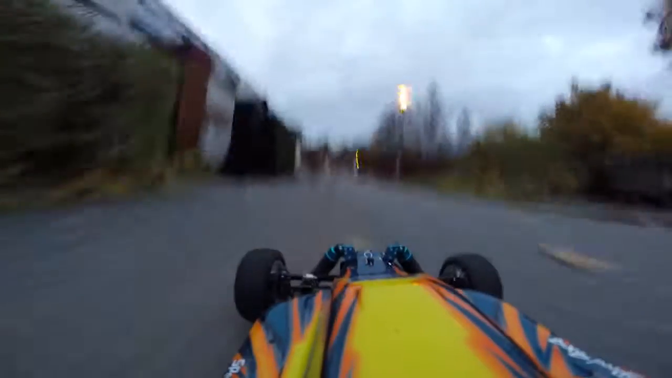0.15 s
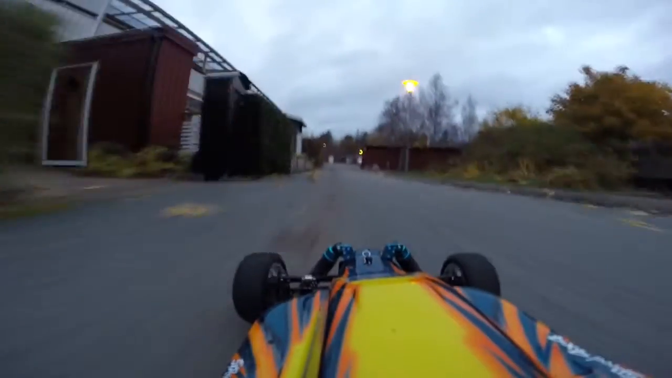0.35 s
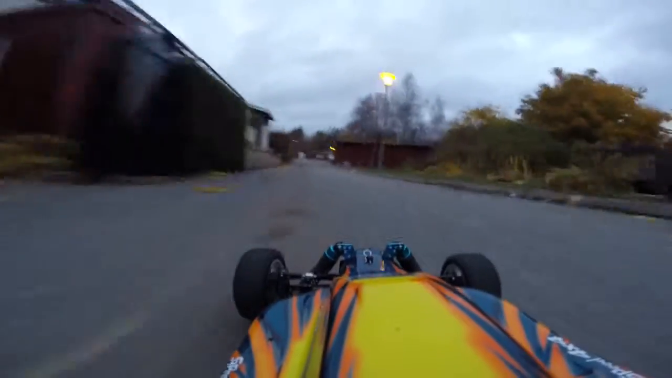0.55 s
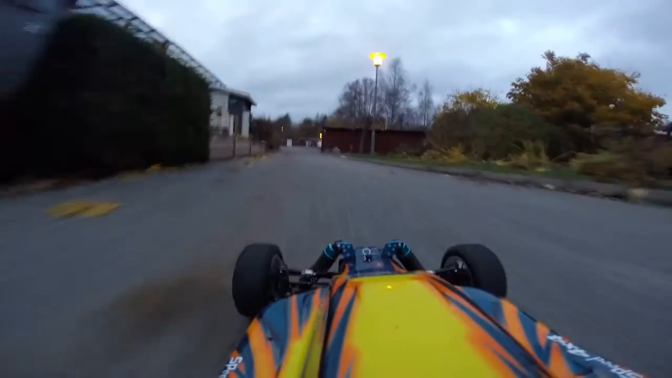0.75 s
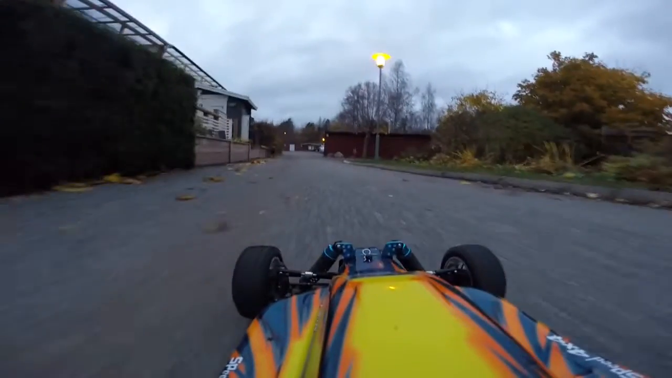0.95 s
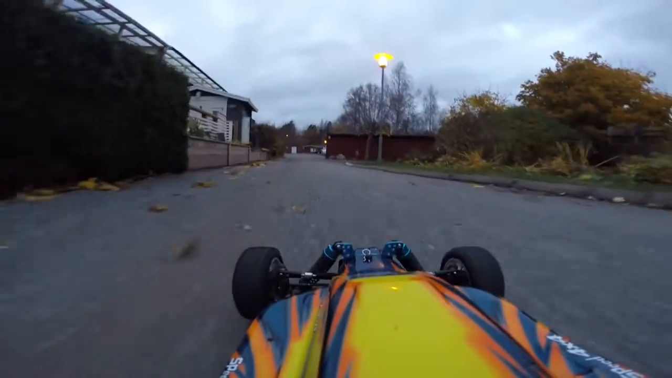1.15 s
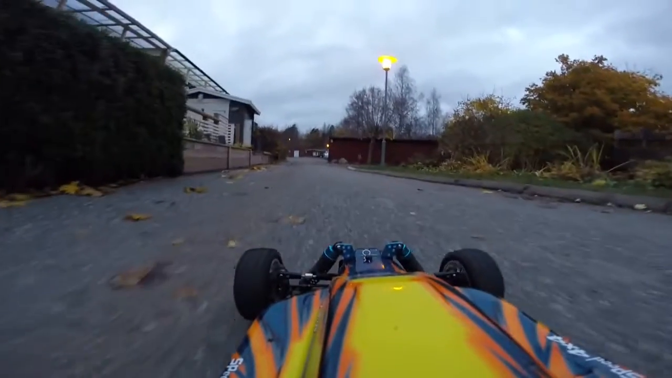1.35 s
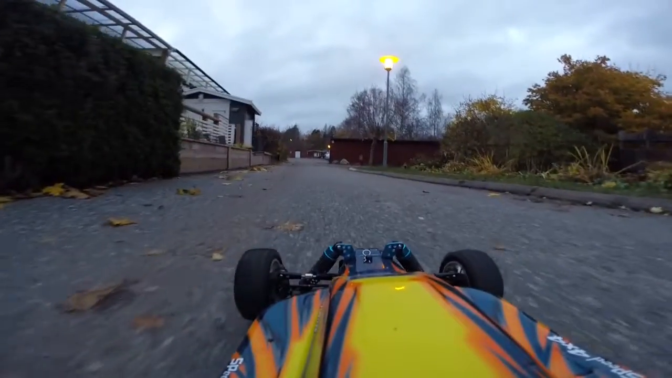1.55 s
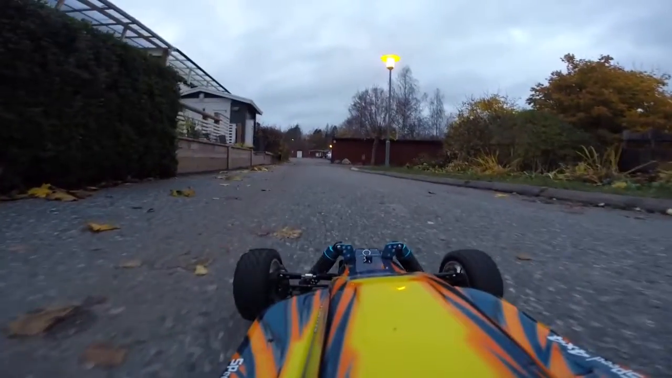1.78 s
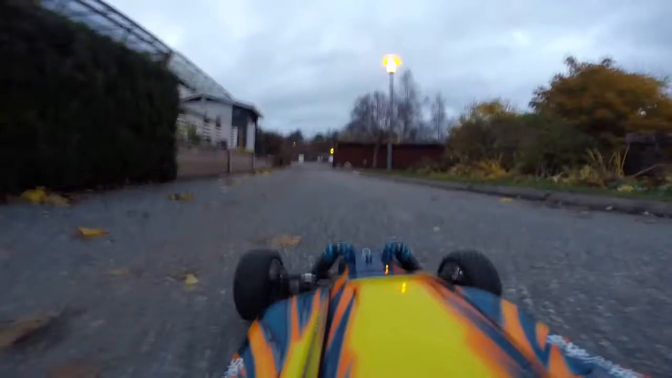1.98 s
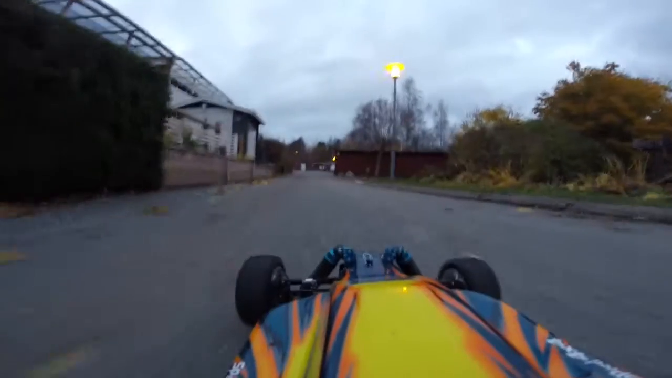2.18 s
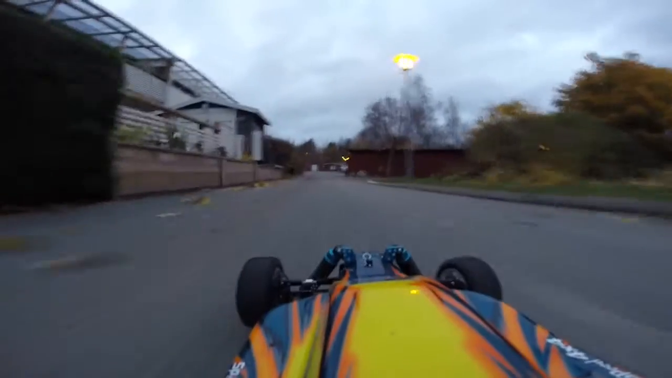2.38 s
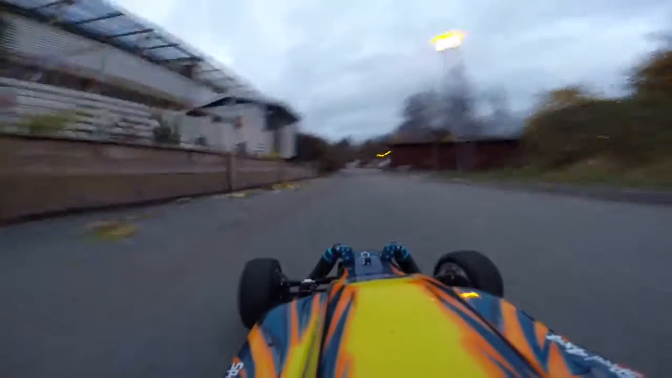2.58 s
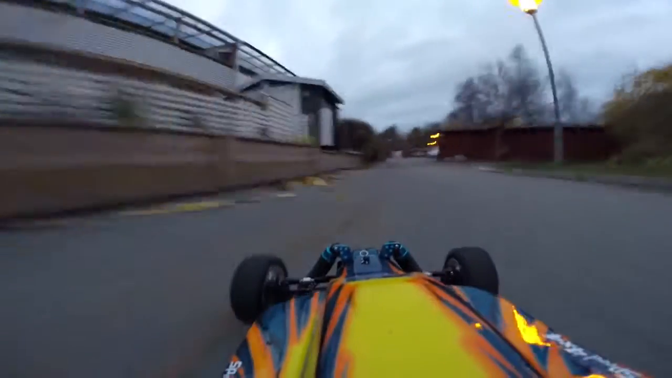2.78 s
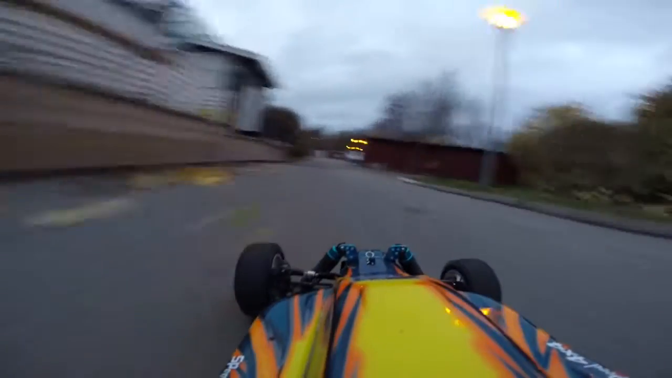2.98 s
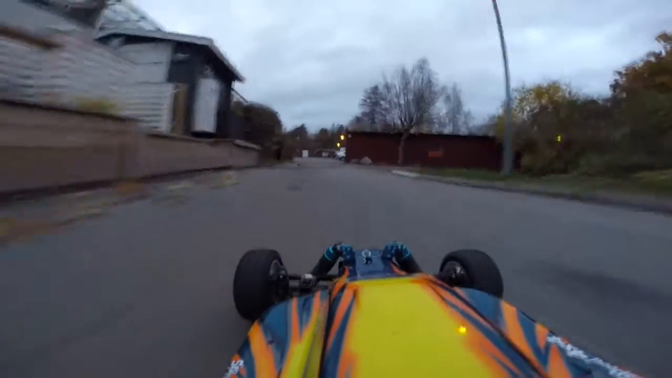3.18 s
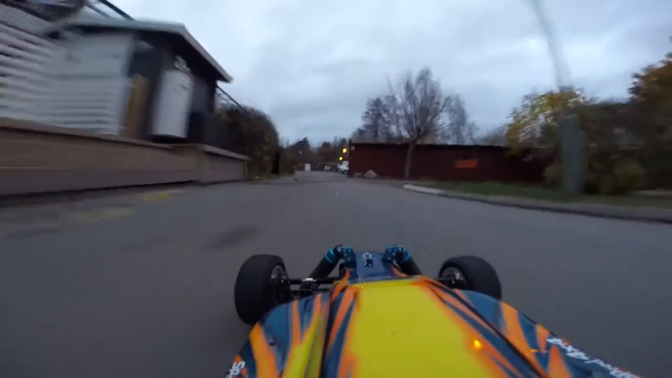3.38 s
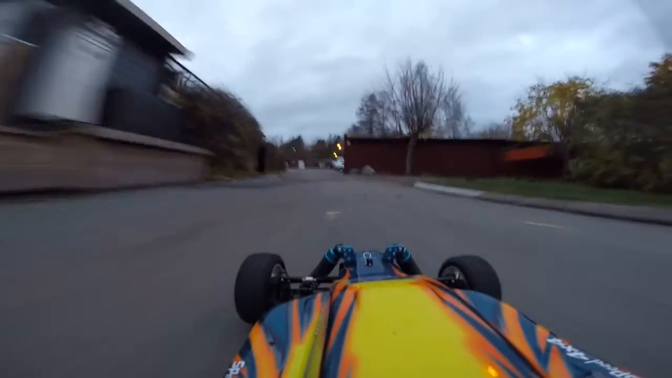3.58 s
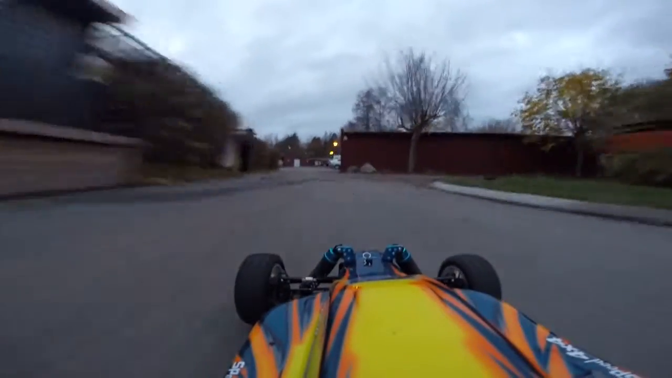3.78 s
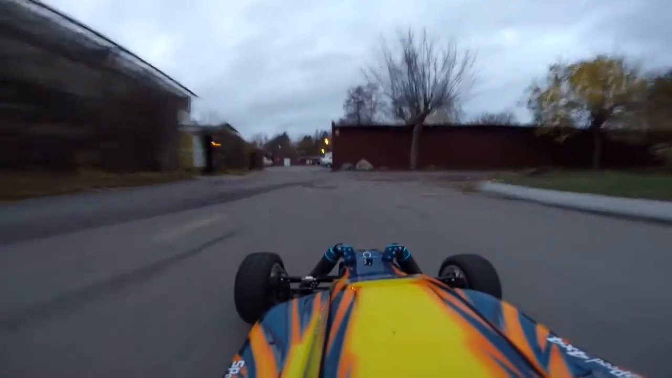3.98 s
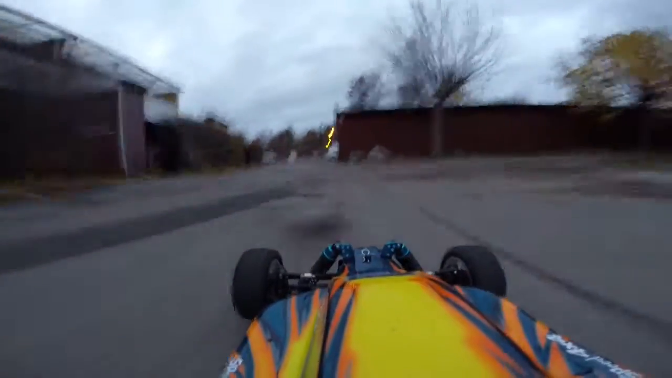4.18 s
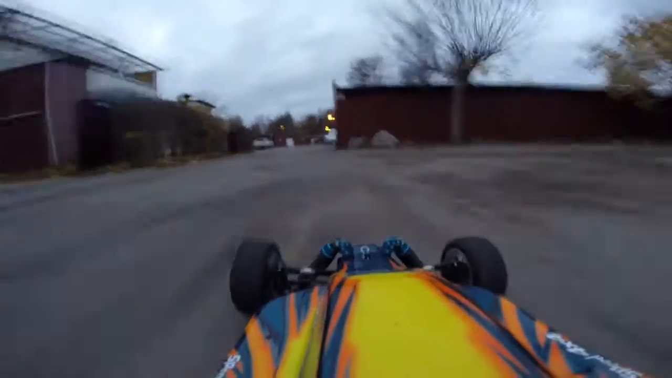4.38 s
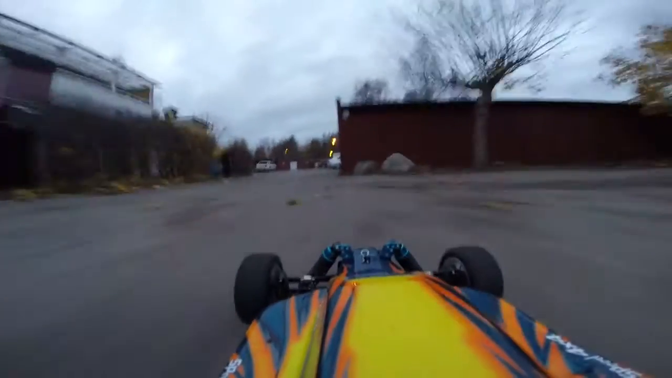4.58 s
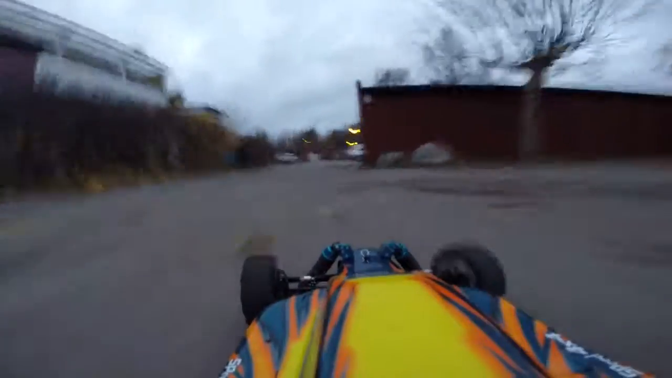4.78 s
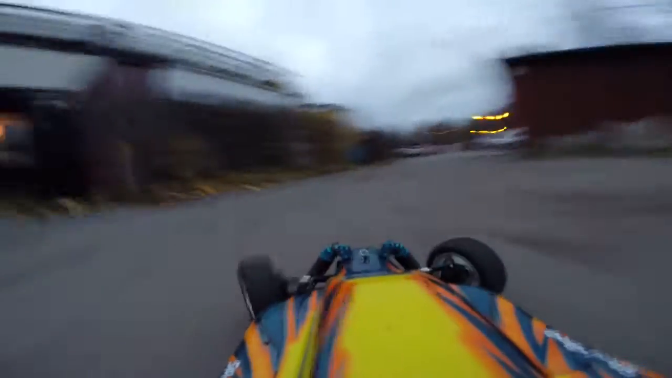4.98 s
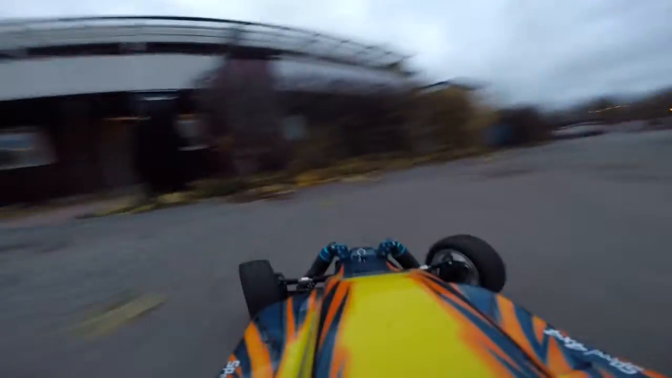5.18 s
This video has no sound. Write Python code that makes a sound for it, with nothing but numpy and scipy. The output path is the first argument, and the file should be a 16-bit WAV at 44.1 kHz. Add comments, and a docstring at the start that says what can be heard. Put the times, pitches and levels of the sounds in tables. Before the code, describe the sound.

A small electric remote-control buggy is heard close up from its own body, with tyres rolling on asphalt and low wind rumble throughout. It starts with a high, rising motor whine and chattering gears. At about 0.5 seconds there is a knock, and the brake sings a steady high note until 1.3 seconds while the whine falls away. The car rolls slowly and more quietly, with a low fan hum. Around 1.9 to 2 seconds several sharp knocks and thuds shake the plastic shell. The raspy whine then climbs until 2.6 seconds and eases into a rattling coast. From 3.2 seconds it rises again, reaching its highest pitch just before 4 seconds. A short braking tone follows from 4.2 to 4.4 seconds as the pitch drops. The buggy then coasts with rattles, a softer sinking whine and stronger rumble until about 5 seconds.

```python
"""A whining, rattling little radio-controlled buggy races along a paved lane, heard from its own body.
It speeds up, brakes to a roll, bumps and pulls away, coasts, sprints and brakes again.
The electric motor's whine rises with speed, and the fast-switching brake sings one fixed note.
Gears, tyres and bumps shake the plastic shell and make it ring.
Underneath, a cooling fan hums and wind buffets the microphone."""
import sys
import numpy as np
from scipy import signal
from scipy.fft import rfft, irfft
from scipy.io import wavfile

SR = 44100
rng = np.random.default_rng(int(sys.argv[2]) if len(sys.argv) > 2 else 0)


def to_wav(sig):
    """Store sig (one row per channel, or 1-D mono) as 16-bit WAV at the path in sys.argv[1].

    Samples outside -1..1 are clipped; the rate is SR.
    """
    pcm = np.clip(np.atleast_2d(sig), -1, 1) * 32767
    pcm = np.round(pcm).astype(np.int16)
    wavfile.write(sys.argv[1], SR, pcm.T)  # frames by channels


N = 231260
TIME = np.arange(N) / SR
HZ = np.fft.rfftfreq(8192, 1 / SR)
# "speed" is the base pitch of the whine in Hz; "cycles" counts its waves since the start
CRUISE_HZ, BRAKE_HZ = 800, 1016.4  # cruising speed; how fast the brake switches on and off

# when the throttle is open: start/s, end/s, gear chatter/dB, brightness/dB, whine/dB
THROTTLES = [(-.1, .485, -16, 1.5, -3.5), (2.015, 2.608, -18, 3, -1.5), (3.16, 3.979, -17.5, 2, -2)]
# when the brake is on: start/s, end/s, gear chatter/dB, brightness/dB, whine/dB
BRAKES = [(0.54, 1.274, -18, -9, 0), (4.156, 4.436, -15, -4, -4.5)]


def amp(db):
    """Turns decibels into a number to multiply by."""
    return 10 ** (np.asarray(db) / 20)


def unit(x):
    """Scales a signal to an average strength (rms) of one."""
    return x / np.sqrt(np.mean(x ** 2) + 1e-20)


def curves(rows):
    """Joins a table's points with straight lines in time, one curve per column."""
    times, *columns = np.transpose(rows)
    return [np.interp(TIME, times, column) for column in columns]


def wander(hz):
    """A smooth random wobble of strength one, mostly slower than hz."""
    size = N // 16 + 2
    f = np.fft.rfftfreq(size, 16 / SR)
    slow = irfft(rfft(rng.standard_normal(size)) / (1 + (f / hz) ** 4), size)
    return unit(np.interp(np.arange(N) / 16, np.arange(size), slow))


def tinted_noise(points):
    """Noise of strength one, coloured by rows of f/Hz, level/dB."""
    hz, db = np.transpose(points)
    f = np.fft.rfftfreq(N, 1 / SR)
    gain = amp(np.interp(np.log(f + 1), np.log(hz), db))
    return unit(irfft(rfft(rng.standard_normal(N)) * gain, N))


def highs(x, hz):
    """The part of a sound above hz."""
    return signal.sosfiltfilt(signal.butter(4, hz, "high", fs=SR, output="sos"), x)


def switched(rows, edge_s=0.012):
    """Throttle or brake over time: how far on (0-1), chatter gain, brightness in dB, whine gain."""
    held = np.array([np.clip(np.minimum(TIME - on, off - TIME) / edge_s, 0, 1) for on, off, *_ in rows])
    chatter_db, bright_db, whine_db = np.transpose(rows)[2:]
    return held.sum(0), amp(chatter_db) @ held, bright_db @ held, amp(whine_db) @ held


def throttle():
    """How far the throttle is open, 0-1."""
    return switched(THROTTLES)[0]


def braking():
    """How far the brake is on, 0-1."""
    return switched(BRAKES)[0]


def coasting():
    """One while neither throttle nor brake is on."""
    return np.clip(1 - throttle() - braking(), 0, 1)


def shell_gain(hz):
    """How strongly the plastic shell answers when shaken at hz."""
    # pitches at which the shell and its camera case ring: f/Hz, width/Hz, level/dB
    resonances = [(327, 600, -19.5), (728, 265, -9.5), (1320, 273, -9.5), (1548.5, 333, 3), (2039, 308, 2),
                  (2548, 118, -5.5), (2662, 228, -9), (3103, 120, -22), (3543, 560, -25),
                  (4290, 320, -21.5), (4760, 270, -19.5), (5040, 450, -27.5), (5690, 610, -25),
                  (6380, 490, -29.5), (6954, 360, -35.5), (7980.0, 640, -44), (9580, 1900, -48.5),
                  (11400, 920.0, -56), (13480.0, 5500, -68)]
    power = sum(amp(db) ** 2 / (1 + (1.2 * (hz - f) / width) ** 2) ** 3 for f, width, db in resonances)
    return np.sqrt(power + 1e-12)


def ring(force):
    """A force shakes the shell and takes on its ringing colour."""
    log_gain = np.log(shell_gain(HZ))
    mirrored = np.r_[log_gain, log_gain[-2:0:-1]]
    # the shell's sound after one sharp tap (minimum phase: it starts at once)
    tap = np.fft.ifft(np.exp(np.conj(signal.hilbert(mirrored)))).real[:2048]
    return signal.oaconvolve(force, tap / np.linalg.norm(tap))[:N]


def rumble(gust_db=1.5, bump_db=2.5):
    """Wind gusts against the microphone, and road bumps boom through the buggy's frame."""
    # strength of both rumbles: t/s, wind/dB, boom/dB
    levels = [(0, -26.5, -31), (.56, -35.5, -31.5), (.72, -37.5, -38.5), (1.7, -37, -39), (2.03, -22, -23),
              (2.22, -34, -35), (2.65, -33.5, -33), (2.96, -35, -25), (3.2, -29.5, -35),
              (3.7, -36.5, -31.5), (4.25, -32.5, -35.5), (4.65, -39, -36.5), (4.85, -25, -28),
              (5.24, -28.5, -22)]
    # colour of the wind: f/Hz, level/dB
    wind_colour = [(10, -15.5), (25, 3.5), (45, -13), (70, -5.5), (110, -10), (200, -41.5), (500, -67.5),
                   (3000, -110)]
    # colour of the booming frame: f/Hz, level/dB
    boom_colour = [(50, -23), (100, -5.5), (145, 4), (185, 2.5), (220, 10.5), (260, 1.5), (340, -6.5),
                   (600, -35.5), (3000, -110)]
    wind_db, boom_db = curves(levels)
    wind = amp(wind_db + gust_db * wander(hz=5)) * tinted_noise(wind_colour)
    boom = amp(boom_db + bump_db * wander(hz=10)) * tinted_noise(boom_colour)
    return wind + boom


def fan(pitch_hz=234.6, waver=0.0023):
    """The cooling fan spins at a nearly steady rate and hums one low note."""
    # strength of the hum: t/s, level/dB
    levels = [(0, -52.5), (1.2, -36), (1.3, -29), (1.6, -26.5), (1.7, -22), (1.88, -20), (1.97, -54),
              (5.24, -34)]
    cycles = np.cumsum(pitch_hz * (1 + waver * wander(hz=10))) / SR
    return np.sqrt(2) * amp(curves(levels)[0]) * np.sin(2 * np.pi * cycles)


def axle(speed, cycles, cycles_per_turn=5.6, top_hz=214, top_db=-25.5, db_per_octave=41, rough=0.2):
    """An unbalanced axle drones under throttle, fading fast below top speed."""
    octaves = np.log2(speed / cycles_per_turn / top_hz)
    level = amp(top_db + db_per_octave * octaves) * throttle()
    tone = np.sqrt(2) * np.sin(2 * np.pi * cycles / cycles_per_turn)
    return level * tone * (1 + rough * wander(hz=25))


def tyres(speed, level_db=-28.5, bumps_db=2.3, swell_db=2.0, db_per_octave=0.3):
    """Tread rolls over coarse asphalt, swelling at each small bump, softer and duller when slow."""
    # push of the tyres on the shell: f/Hz, level/dB
    push_colour = [(250, -8), (450, -4.5), (780, 6.5), (1100, -11.5), (1550, -9), (2150, -2), (2700, -12),
                   (3600, -41.5), (6000, -1.5), (12000, -21.5)]
    push = tinted_noise(push_colour) * amp(bumps_db * wander(hz=44.8) + swell_db * wander(hz=6.9))
    roll = unit(ring(push))
    octaves = np.log2(speed / CRUISE_HZ)
    treble_change = (amp(3.5 * octaves) - 1) * highs(roll, hz=2800)
    return amp(level_db + db_per_octave * octaves) * (roll + treble_change)


def knocks(thud_s=0.0041, mount_hz=225, mount_gain=0.7):
    """The frame hits the road: the shell cracks, then the frame and camera mount bounce with a thud."""
    # each knock: t/s, crack/dB, thud/dB, thud pitch/Hz, thud delay/s, crack decay/s
    hits = [(0.561, -9, -13.5, 110, 0.0016, 0.0022), (1.61, -17.5, -46, 110, 0.0027, 0.0018),
            (1.891, -5.5, -43, 200, .002, 0.0027), (1.926, -9.5, -9, 32, 0.0096, 0.0093),
            (1.968, -2.5, -11, 74, 0.0081, 0.0046), (2.0112, -7, -4.5, 87, .010, 0.01)]
    # colour of a knock's force: f/Hz, level/dB
    force_colour = [(60, 4), (300, 15.5), (700, 10), (1500, -2.5), (4000, -1.5), (12000, -1)]
    cracks, thuds = np.zeros(N), np.zeros(N)
    for start, crack_db, thud_db, hz, delay, decay in hits:
        age, thud_age = np.maximum(TIME - start, 0), np.maximum(TIME - start - delay, 0)
        cracks += amp(crack_db) * (age > 0) * np.exp(-age / decay)
        bounce = np.sin(2 * np.pi * hz * thud_age) + mount_gain * np.sin(2 * np.pi * mount_hz * thud_age)
        thuds += amp(thud_db) * np.exp(-thud_age / thud_s) * bounce
    force = tinted_noise(force_colour)
    return ring(cracks * force) / np.std(ring(force)) + thuds


def wheel_rattles(speed, cycles_per_turn=38.5, gap_share=0.21):
    """Loose drive parts rattle in step with the wheels; gives rows of t/s, level/dB, length/s."""
    # spells of rattling: start/s, end/s, level/dB, rattles per wheel turn
    spells = [(2.424, 2.61, -17, 2), (2.646, 3.17, -12.5, 1), (4.02, 4.14, -11.5, 1),
              (4.528, 5.24, -12.5, 1)]
    wheel_turns = np.cumsum(speed) / SR / cycles_per_turn
    bursts = []
    for start, end, db, per_turn in spells:
        step = 1 / round(per_turn)
        first, last = np.interp([start, end], TIME, wheel_turns)
        for t in np.interp(np.arange(first, last, step), wheel_turns, TIME):
            gap_s = step * cycles_per_turn / np.interp(t, TIME, speed)
            bursts.append((t, db, gap_share * gap_s))
    return bursts


def jolts(speed, per_s=20, level_db=-20, spread_db=8, db_per_octave=14, length_s=0.0042):
    """Small random bumps, gentler when slow, felt only while the throttle keeps the gears tight."""
    gaps, sizes = rng.random((200, 2)).T
    times = np.cumsum(.5 + gaps) / per_s
    octaves = np.minimum(np.log2(np.interp(times, TIME, speed) / CRUISE_HZ), 0)
    levels = level_db + spread_db * (2 * sizes - 1) + db_per_octave * octaves
    tight = np.interp(times, TIME, throttle()) > .5
    return [(t, db, length_s) for t, db in zip(times[tight], levels[tight])]


def shaking(speed, rise=0.4, fall=0.57):
    """How hard bumps and rattles shake the shell: each swells faster than it dies away."""
    # bumps in the road: t/s, level/dB, length/s
    bumps = [(.058, -12, 0.011), (.144, -12, 0.0042), (.288, -9, 0.0066), (.38, -13, 0.0061),
             (.514, -8, 0.014), (.532, -10, 0.0074), (.56, -9.5, .007), (.59, -10.5, 0.0062),
             (.884, -15, .006), (1.905, -12.5, 0.018), (1.932, -14, 0.018), (2.137, -14, 0.015),
             (2.176, -24, 0.007), (2.318, -16.5, 0.013), (2.358, -12.5, 0.015), (2.427, -8, 0.0037),
             (2.866, -11, 0.0045), (2.886, -14, .005), (3.004, -10.5, .004), (3.119, -11, 0.015),
             (3.209, -12, 0.018), (3.279, -9.5, 0.0062), (3.333, -12, 0.0033), (3.465, -16, 0.0057),
             (3.817, -14, .005), (3.951, -21, 0.0039), (3.992, -10, 0.0092), (4.155, -10.5, .009),
             (4.997, -13, 0.011), (5.079, -7.5, 0.0028)]
    power = np.zeros(N)
    for t, db, length in bumps + wheel_rattles(speed) + jolts(speed):
        near = slice(max(int((t - .05) * SR), 0), int((t + .05) * SR))
        age = (TIME[near] - t) / length + (fall - rise) / 2
        power[near] += amp(db) ** 2 * np.exp(-(age / np.where(age < 0, rise, fall)) ** 2)
    return np.sqrt(power)


def gear_case(speed, pitch_hz=4970, level_db=-36.5, width_hz=260, wake_hz=914, ramp_hz=70):
    """Fast, hard-working gears keep their case ringing with a fuzzy high whistle."""
    awake = throttle() * (1 + np.tanh((speed - wake_hz) / ramp_hz)) / 2
    phase = 2 * np.pi * pitch_hz * TIME
    whistle = wander(hz=width_hz) * np.cos(phase) + wander(hz=width_hz) * np.sin(phase)
    return amp(level_db) * awake * whistle


def lull(delay_s=0.023, width_s=0.025, depth_db=-7):
    """The gear teeth float free for a moment after the throttle closes, so the level dips."""
    dips = sum(np.exp(-((TIME - end - delay_s) / width_s) ** 2) for _, end, *_ in THROTTLES)
    return amp(depth_db * dips)


def chatter(speed, coast_db=-21, coast_bright_db=1.5, db_per_octave=3, bright_db_per_octave=1.5):
    """Strength and brightness (dB) of the gear noise: both grow with speed and change with load."""
    octaves, coast = np.log2(speed / CRUISE_HZ), coasting()
    _, driven, bright_db, _ = switched(THROTTLES + BRAKES)
    strength = (driven + coast * amp(coast_db)) * amp(db_per_octave * octaves)
    bright_db += (1 - coast) * bright_db_per_octave * octaves + coast * (coast_bright_db + octaves)
    return strength, bright_db


def gears(speed, cycles, shake, flutter_db=1.7, spread_db=1.5, hits_per_s=7000, hiss=0.71, beat=0.35):
    """Gear teeth strike in a stream of tiny uneven hits that ring the shell."""
    strength, bright_db = chatter(speed)
    steady = strength * amp(flutter_db * wander(hz=110))
    sizes = amp(spread_db * np.minimum(rng.exponential(1, N), 4)) * np.sign(rng.standard_normal(N))
    hits = unit(sizes * (rng.random(N) < hits_per_s / SR))
    hits = unit(hits + hiss * rng.standard_normal(N))
    hits *= unit(1 + beat * np.cos(4 * np.pi * cycles))  # hardest twice a cycle
    # braking jerks the teeth together at the switching rate: sharper hits, a thinner rasp
    jerks = np.diff(hits, prepend=0) * (1 + np.cos(2 * np.pi * BRAKE_HZ * TIME))
    jerks /= np.std(ring(jerks))
    share = braking() * np.minimum(speed / CRUISE_HZ, 1) ** .5  # milder as the wheels slow
    force = np.sqrt(np.clip(1 - share, 0, 1)) * hits + np.sqrt(share) * jerks
    sound = ring(force * np.hypot(steady, shake))
    return sound + (amp(bright_db) - 1) * highs(sound, hz=3300)


def brake(speed, cycles, rough=0.35, glide_db=-21, slip=0.13):
    """The brake chops the current on and off, making the motor's coils sing at a fixed pitch."""
    # tones at 1 to 5 times the switching rate: level/dB
    harmonics = [-28.5, -28.5, -51, -58, -62]
    note = sum(amp(db) * np.cos(2 * np.pi * k * BRAKE_HZ * TIME) * (1 + rough * k * wander(hz=50))
               for k, db in enumerate(harmonics, 1))
    # one more tone glides along at the switching rate plus twice the base pitch
    glide = np.cos(2 * np.pi * (BRAKE_HZ * TIME + 2 * cycles + slip * wander(hz=80)))
    glide *= 1 + rough * wander(hz=120)
    glide_level = amp(glide_db) * np.sqrt(speed / CRUISE_HZ) * shell_gain(BRAKE_HZ + 2 * speed)
    return np.sqrt(2) * braking() * (note + glide_level * glide)


def motor(speed, cycles, shake, rough=0.36, slip=0.055, smear=0.82, rest=0.38, press=4.8, idle_hz=250):
    """The motor's tones glide through the shell's ringing pitches, turning raspy as they rise."""
    # tones of the whine: multiple of the base pitch
    multiples = (1, 2, 2.5, 4, 5, 10)
    # each tone before the mount and shell colour it: throttle/dB, braking/dB, coasting/dB
    tone_levels = [(-17.5, -28, -30.5), (-16.5, -14.5, -20.5), (-27, -46, -46.5), (-30.5, -24.5, -27),
                   (-13, -29.5, -36), (-19, -48, -55.5)]
    # how well the motor mount carries the whine into the shell: f/Hz, level/dB
    mount = [(200, -16.5), (380, -9), (500, 1.5), (780, 1.5), (1000, -0.5), (1170, 3), (1400, 2),
             (1650, -2), (1950, -1.5), (2500, -4.5), (3500, -3), (4300, -12), (4950, 2.5), (5400, -2),
             (5900, -4), (7200, -12)]
    mount_hz, mount_db = np.transpose(mount)
    loads = np.array([switched(THROTTLES)[3], switched(BRAKES)[3], coasting()])
    spun_up = np.minimum(speed / idle_hz, 1)
    whine = np.zeros(N)
    for k, levels_db in zip(multiples, tone_levels):
        hz = k * speed
        slack = (slip + smear * (hz / 5000) ** 2) * wander(hz=80)  # play in the gears blurs the pitch
        tone = np.cos(2 * np.pi * (k * cycles + slack)) * (1 + rough * wander(hz=130))
        level = amp(levels_db) @ loads * spun_up ** (0.12 * k)  # at a crawl the high tones fade first
        mount_gain = amp(np.interp(np.log(hz), np.log(mount_hz), mount_db))
        # the second tone throbs: each shake presses it harder into the shell
        contact = rest + press * shake if k == 2 else 1
        whine += level * mount_gain * np.interp(hz, HZ, shell_gain(HZ)) * contact * tone
    return np.sqrt(2) * whine


def scene():
    """Adds up all the sources. They ride with the microphone, so there is no echo and no pass-by."""
    # the buggy's speed, as the base pitch of its whine: t/s, f/Hz
    speed_points = [(0, 880), (.55, 1040), (.72, 745), (.9, 495), (1.05, 310), (1.26, 170), (1.4, 100),
                    (1.9, 50), (2.02, 70), (2.28, 398), (2.37, 550), (2.57, 780), (2.68, 637), (2.88, 640),
                    (2.97, 580), (3.17, 565), (3.3, 750), (3.55, 955), (3.92, 1205), (4.13, 1115),
                    (4.33, 480), (4.47, 715), (4.77, 650), (4.97, 497), (5.24, 385)]
    smooth_speed = curves(speed_points)[0]
    speed = smooth_speed * (1 + 0.00603 * wander(hz=23.84))
    cycles = np.cumsum(speed) / SR
    shake = shaking(smooth_speed)
    drive = lull() * (gears(speed, cycles, shake) + motor(speed, cycles, shake) + gear_case(speed))
    mix = drive + brake(speed, cycles) + tyres(speed) + fan() + axle(speed, cycles) + knocks() + rumble()
    return mix[None]


def record(dry, top_hz=15200):
    """Rounds off the loudest peaks, then cuts the treble above top_hz."""
    rounded = dry / (1 + dry ** 8) ** (1 / 8)
    treble_cut = signal.firwin(255, top_hz, window=("kaiser", 9), fs=SR)
    return signal.oaconvolve(rounded, treble_cut[None], "same")


dry = scene()
out = record(dry)
to_wav(out)
```